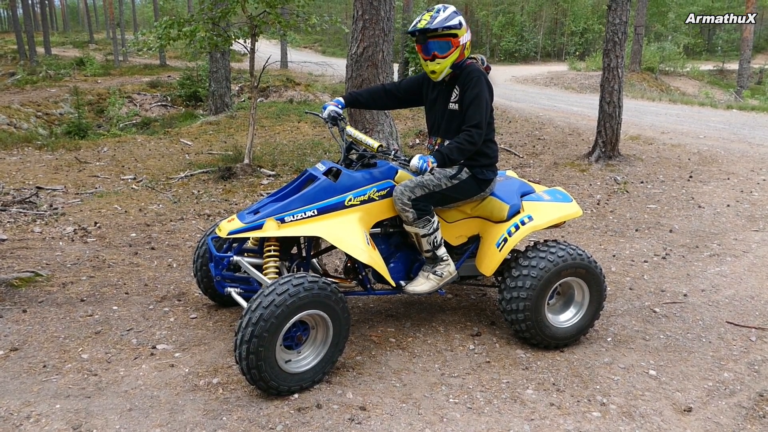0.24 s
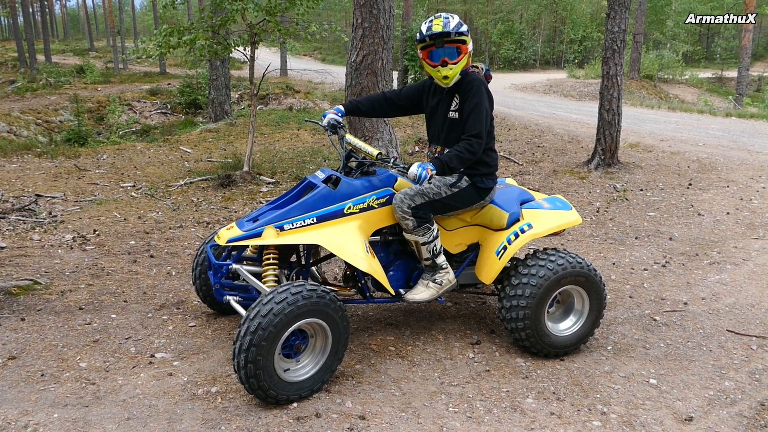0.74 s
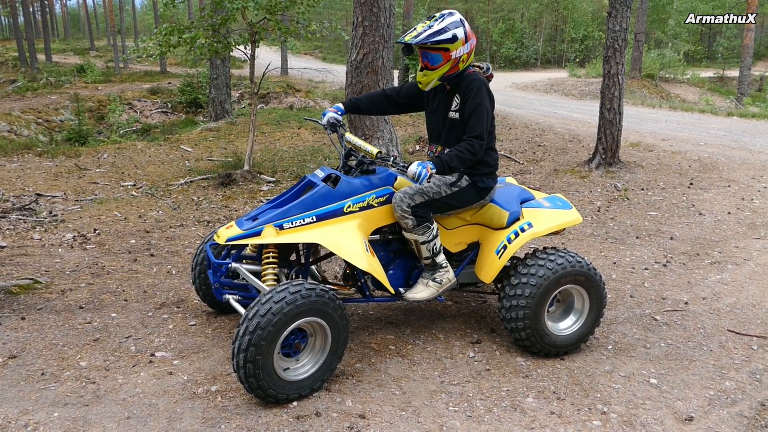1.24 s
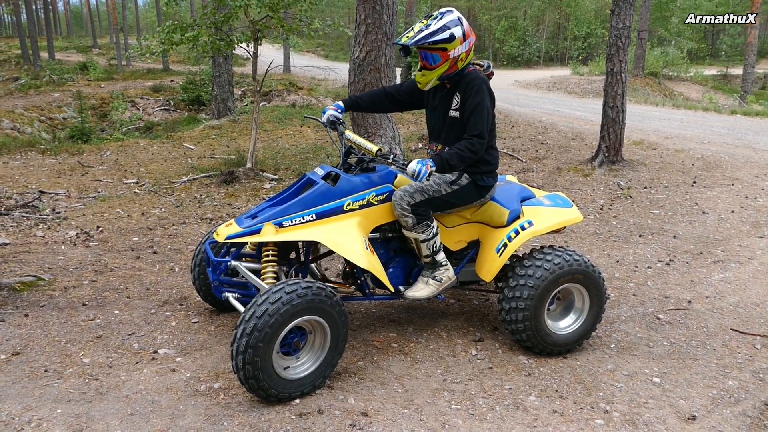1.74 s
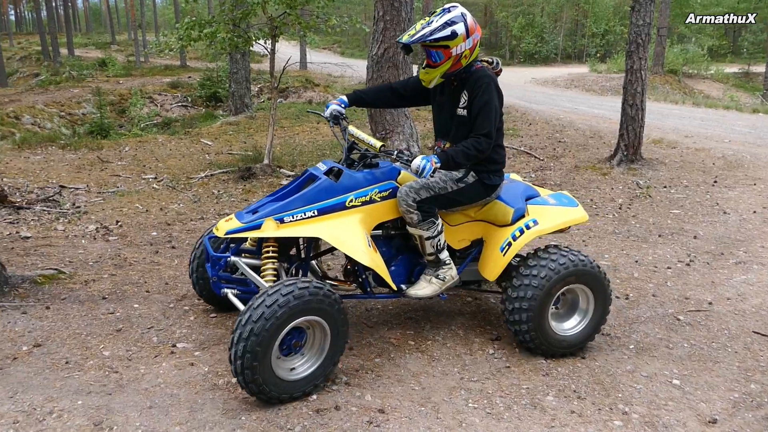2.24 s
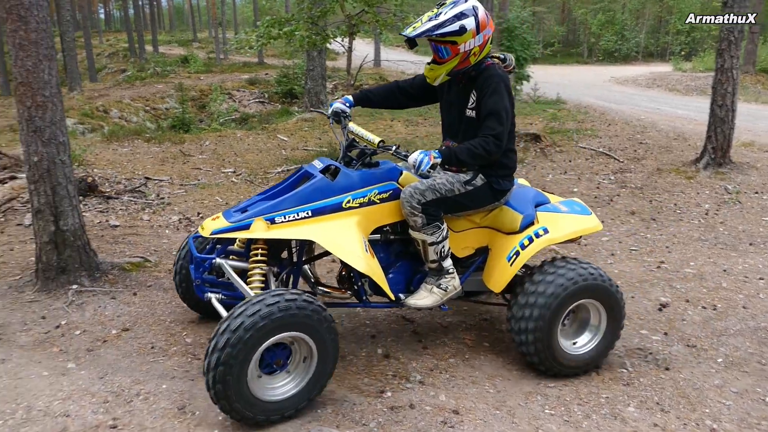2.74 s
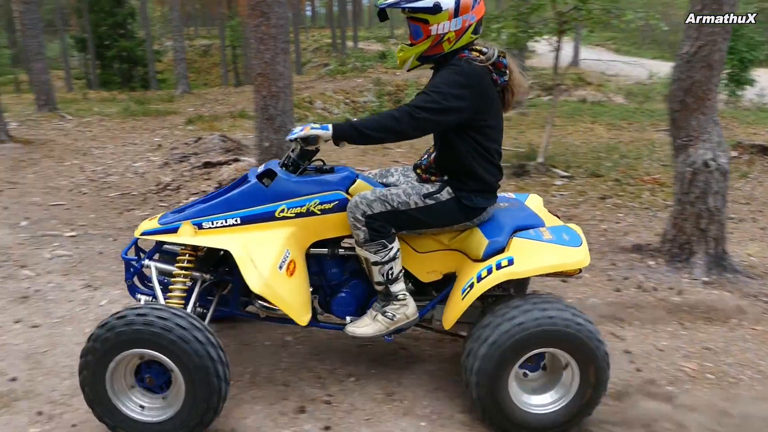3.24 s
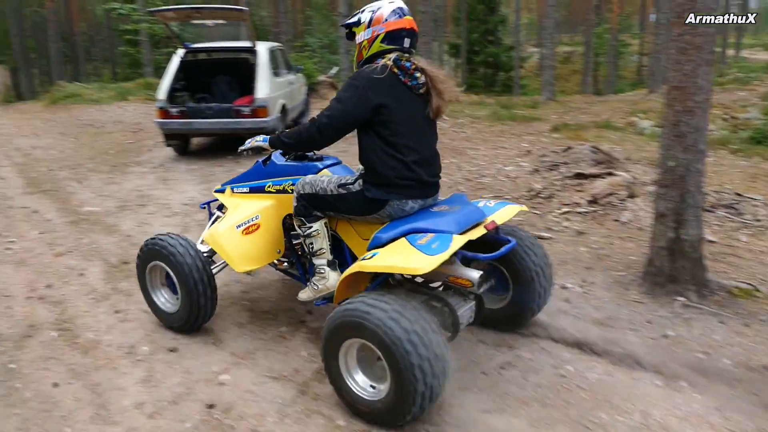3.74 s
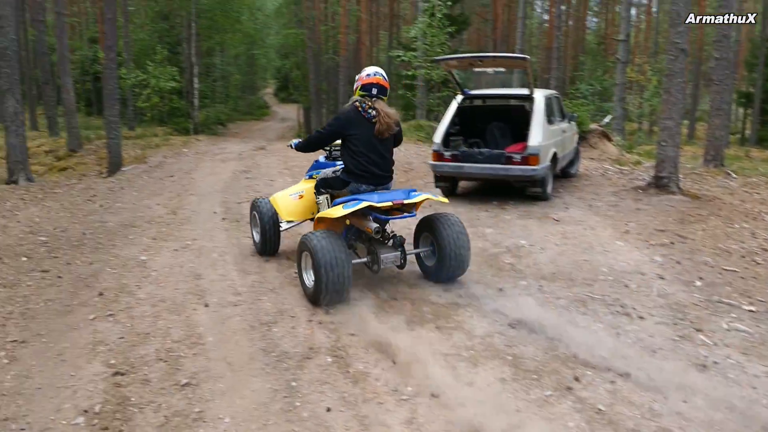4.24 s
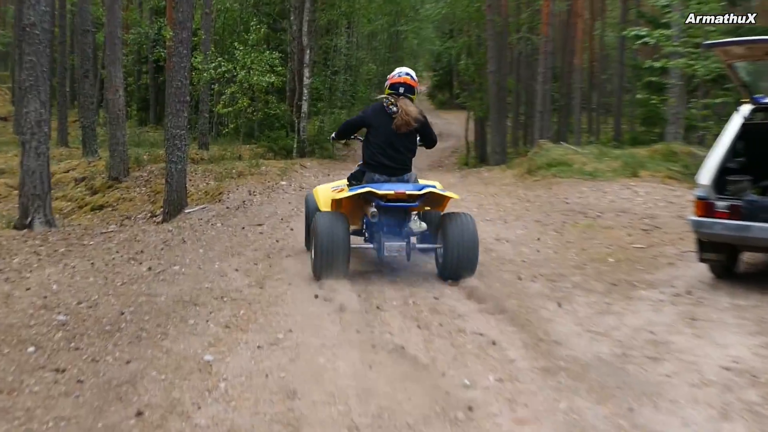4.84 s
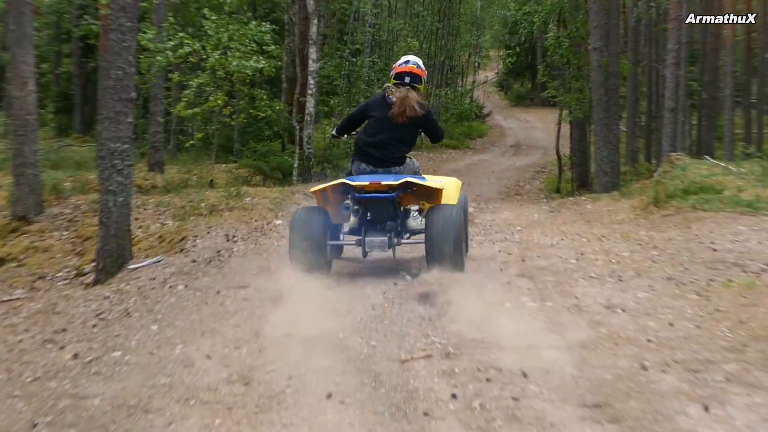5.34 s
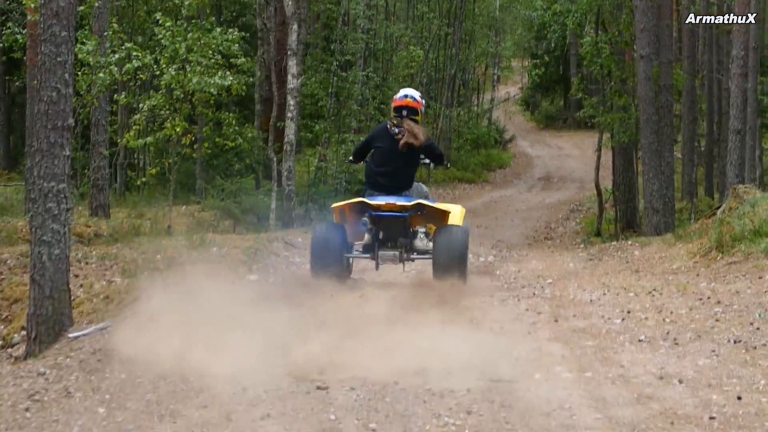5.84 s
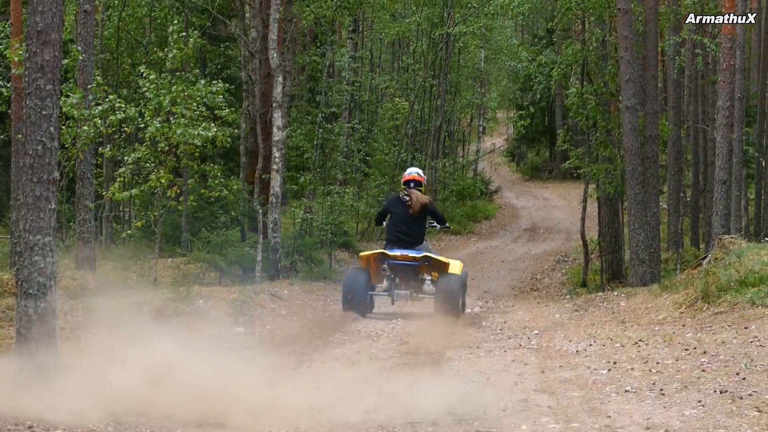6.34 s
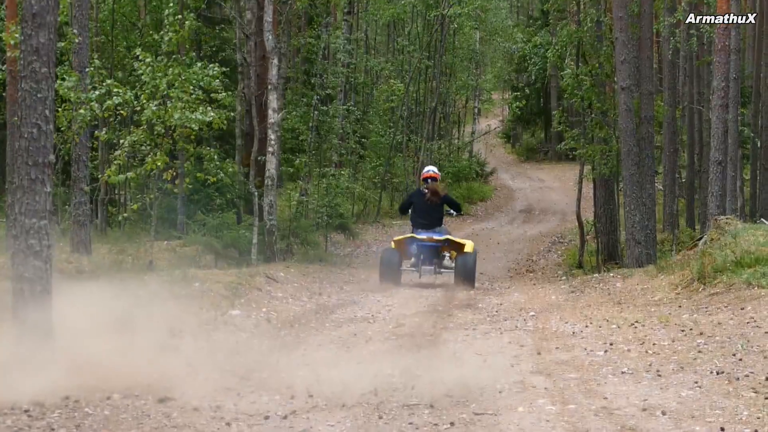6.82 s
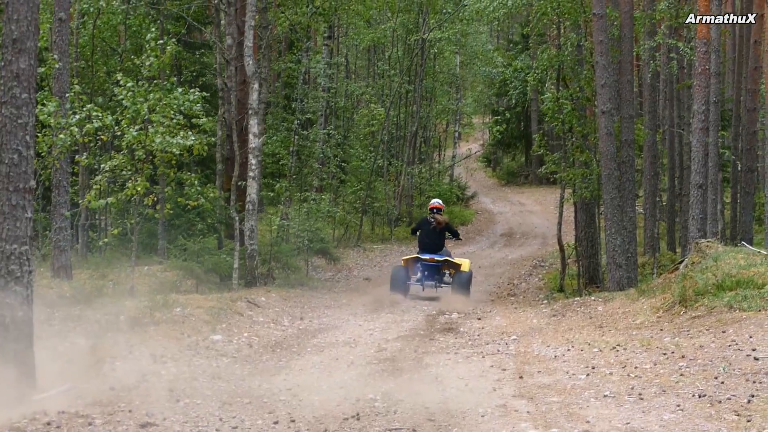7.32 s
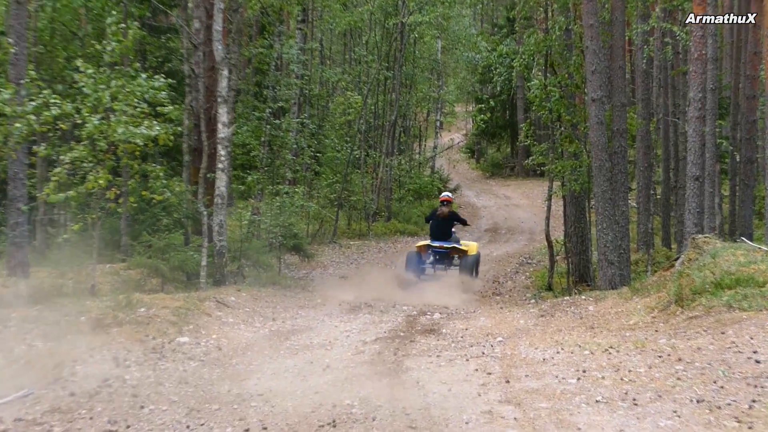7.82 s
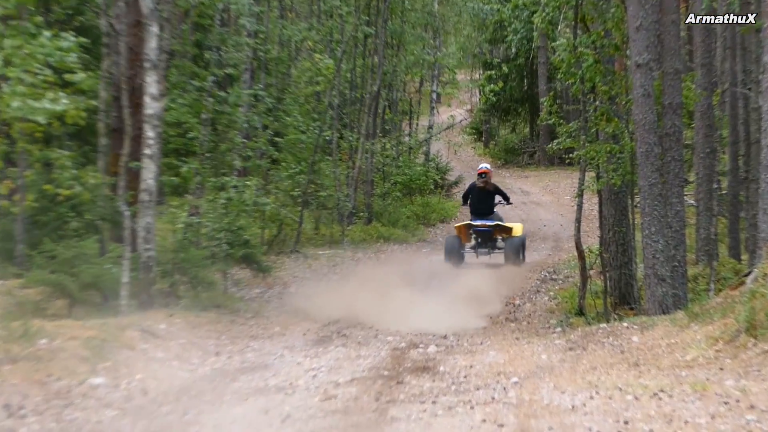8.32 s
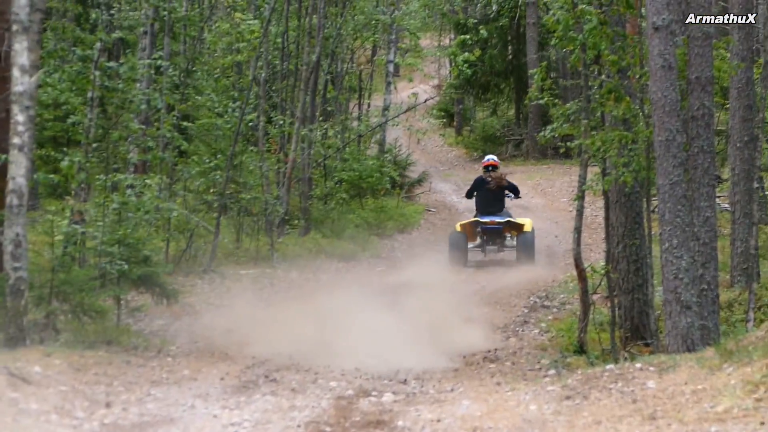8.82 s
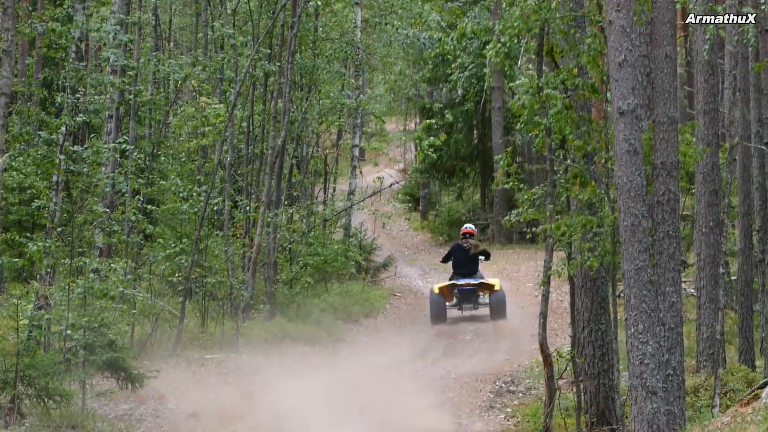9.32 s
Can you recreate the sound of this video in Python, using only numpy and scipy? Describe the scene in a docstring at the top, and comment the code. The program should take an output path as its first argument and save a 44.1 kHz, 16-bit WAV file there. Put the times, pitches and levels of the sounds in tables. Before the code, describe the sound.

Sputtering single-cylinder off-road engine with metallic exhaust ring pops at rest, accelerates hard in surges, then eases to a softer hum among trees.

```python
"""The tailpipe of a single-cylinder two-stroke quad barks, blipped at standstill on a forest track, then riding away.
Each firing sends a pressure pulse down the exhaust and rings the thin steel expansion chamber and the gas in it.
At light throttle only some crank turns fire and the rest puff; under load mostly every turn fires and the note smooths.
Intake gulps, piston slap and the rush of gears and chain lie beneath, and the trees scatter it all into a tail."""
import sys
import numpy as np
from scipy import signal
from scipy.fft import rfft, irfft
from scipy.io import wavfile
from scipy.ndimage import map_coordinates

SR = 44100
rng = np.random.default_rng(int(sys.argv[2]) if len(sys.argv) > 2 else 0)


def output_pcm(signal):
    """Save a mono or channel-first signal as 16-bit PCM at the path in sys.argv[1].

    Samples are clipped to [-1, 1] before scaling.
    """
    pcm = np.clip(np.atleast_2d(signal).T, -1, 1) * 32767
    wavfile.write(sys.argv[1], SR, np.round(pcm).astype(np.int16))


N = 422037
TIME = np.arange(N) / SR
KERNEL = 4096  # length of an impulse response, samples
KERNEL_HZ = np.maximum(np.fft.rfftfreq(KERNEL, 1 / SR), 1)
IDLE_TURNS_PER_S = 50

# crank speed: [time_s, turns_per_s]
CRANK_SPEED = [(0, 53), (.22, 46.7), (.29, 49), (.5, 44.8), (.58, 50), (.68, 53.5), (.76, 51.5), (.92, 47),
               (1, 44.6), (1.6, 45.8), (1.9, 53), (2.2, 49.3), (2.45, 41.6), (2.85, 46.4), (3.15, 45.4),
               (3.4, 54.2), (3.65, 53.2), (4, 64), (4.14, 77.5), (4.65, 48), (4.8, 55.6), (5.17, 61),
               (5.3, 73), (5.38, 83.3), (5.54, 107), (5.75, 76.3), (5.92, 94.4), (6.1, 88), (6.45, 55),
               (6.7, 61.5), (7.1, 64), (7.27, 75.5), (7.41, 82), (7.63, 90), (7.9, 99), (8.06, 105),
               (8.28, 72.8), (9.1, 74), (9.16, 79), (9.29, 71.5), (9.57, 71)]
# the quad turns its tail to the listener: [time_s, view (0 side, 1 rear quarter, 2 rear)]
VIEW_ANGLE = [(3, 0), (3.4, 1.05), (4.1, 0.85), (4.42, 1.49), (4.75, 1.62), (5.2, 1.78), (6.8, 1.8),
              (7.7, 1.8)]
# sound between firings: [time_s, puff_db, clatter_db (at idle speed)]
COASTING = [(0, -15.5, -23.5), (.2, -20.5, -22), (.35, -22.5, -26), (.62, -21, -25.5), (.72, -21, -27),
            (.95, -20, -24), (1.3, -24, -26), (1.6, -23.5, -29), (2.9, -24.5, -29.5), (3.3, -33, -29),
            (4.2, -26.5, -35), (4.4, -27, -35.5), (6.2, -32.5, -40.5), (6.45, -34.5, -41), (8.4, -32, -40),
            (8.9, -31, -40), (9.55, -28.5, -37.5)]
# radiation of the tailpipe: [frequency_hz, side_db, rear_quarter_db, rear_db]
TAILPIPE_COLOUR = [(40, -54, -34, -52), (84, -18.5, -11.5, -28.5), (137, -5, -8, -13),
                   (180, 0.5, -8.5, -4.5), (221, 1.5, -0.5, 1), (283.4, 1.5, 1.5, 4.5), (372, -8, -4.5, -1),
                   (454, -7, 1.5, -1.5), (530, 1, -5.5, -8.5), (688, 0, -3.5, -12), (842, -2.5, -5, -22.5),
                   (956, -10, -19, -24.5), (1187, -12, -16, -14.5), (1620, -22.5, -23, -33),
                   (2000, -24, -36, -21.5), (2390, -25, -36, -31), (3850, -36, -35, -65),
                   (18000, -73, -57, -72)]
# standing waves along the exhaust: [frequency_hz, width_hz, level_db]
STANDING_WAVES = [(191.5, 38, -2), (285.7, 45, -3.5), (344, 37, -6), (664, 57, -7.5), (825, 82, -9.5)]
# hotter gas carries sound faster and raises the chamber's pitch: [time_s, pitch_ratio]
GAS_HEAT = [(1.55, .82), (2.05, .91), (2.4, .95), (2.75, 1), (3.75, 1), (4.05, 1.09), (4.65, .97), (5, .99),
            (5.45, 1.14), (6.1, 1.12), (6.65, .92), (7, .97), (7.45, 1.14), (8.05, 1.2)]
# broad modes of the gas in the chamber: [frequency_hz (at a pitch ratio of one), level_db]
CHAMBER_GAS = [(3035, 5), (3500, -7), (4130, 0), (4780, 2.5), (5650, -5.5)]
# modes of the chamber's steel wall: [frequency_hz, level_db]
CHAMBER_WALL = [(2149, 3), (2492, -0.5), (2778, 3), (2880, -4), (3031, 4), (3208, -1.5), (3467, -5),
                (3709, -1), (3779, 1), (3990, -1.5), (4097, 1), (4284, -2), (4468, -8), (4770, 2),
                (4805, 1.5), (5437, -2), (6804, 2)]


def from_db(db):
    """Amplitude gain is ten to the power of decibels over twenty."""
    return 10 ** (np.asarray(db) / 20)


def unit(x):
    """Normalisation: the squares along the last axis sum to one."""
    return x / np.sqrt(np.sum(x ** 2, axis=-1, keepdims=True) + 1e-20)


def at_time(rows, s):
    """Linear interpolation of every column of a curve at the given times."""
    times, *columns = np.transpose(rows)
    return [np.interp(s, times, column) for column in columns]


def at_hz(rows, hz):
    """Interpolation of every column of a spectrum along logarithmic frequency."""
    points, *columns = np.transpose(rows)
    return np.array([np.interp(np.log(hz), np.log(points), column) for column in columns])


def response(db):
    """Minimum phase: folding the cepstrum gives a causal impulse response of unit energy."""
    cepstrum = irfft(np.log(from_db(db)))
    cepstrum[..., 1:KERNEL // 2] *= 2
    cepstrum[..., KERNEL // 2 + 1:] = 0
    return unit(irfft(np.exp(rfft(cepstrum))))


def through(x, impulse):
    """Linear filtering: convolve with an impulse response; gives channels x N."""
    return signal.oaconvolve(np.atleast_2d(x), np.atleast_2d(impulse), axes=-1)[:, :N]


def high_pass(x, order, hz):
    """Butterworth filter: keep what lies above a frequency."""
    return signal.sosfilt(signal.butter(order, hz, "high", fs=SR, output="sos"), x)


def all_pass(x, hz, q):
    """Phase dispersion: delay the waves around a frequency without changing their level."""
    poles = signal.iirpeak(hz, q, SR)[1]
    return signal.lfilter(poles[::-1], poles, x)


def add(track, s, sound):
    """Superposition: mix a sound into a track at a time."""
    i = int(np.clip(s * SR, 0, N - 1))
    track[i:i + len(sound)] += sound[:N - i]


def clicks(times, sizes):
    """Impulse train: one click of the given size at each time."""
    return np.bincount(np.clip(times * SR, 0, N - 1).astype(int), sizes, N)


def fading(power, t60_s):
    """Exponential decay: spread the energy of each click over time and return the amplitude."""
    keep = from_db(-120 / (t60_s * SR))  # power falls 60 dB in t60_s
    return np.sqrt(signal.lfilter([1 - keep], [1, -keep], power + 1e-18))


def stereo_noise(size, side_db):
    """Interaural coherence: white noise shared by both ears plus a side part of opposite sign."""
    mid, side = rng.standard_normal((2, size))
    return mid + from_db(side_db) * side * [[1], [-1]]


def rearward():
    """Directivity weight at every sample: zero from the side, one from the rear."""
    return at_time(VIEW_ANGLE, TIME)[0] / 2


def crank(jitter_s):
    """Intermittent combustion: times of firing turns, hardness of their burn in dB, times of unfired turns."""
    # stretches of firing: [first_s, last_s, firing_turns, out_of_turns, hardness_db]
    firing_stretches = [(.236, .257, 1, 1, 0.5), (.466, .466, 1, 1, -12), (.53, .551, 1, 1, 0.5),
                        (.651, .651, 1, 1, 0.5), (.931, .931, 1, 1, -18), (1.019, 1.042, 1, 1, -0.5),
                        (1.175, 1.197, 1, 1, -1), (1.35, 1.35, 1, 1, 4), (1.372, 1.372, 1, 1, 0),
                        (1.482, 1.482, 1, 1, 3), (1.503, 1.503, 1, 1, -3), (1.586, 1.67, 1, 4, 1.5),
                        (1.735, 1.835, 2, 4, -1.5), (1.914, 2.246, 2, 4, 1), (2.287, 2.309, 1, 1, -2),
                        (2.351, 2.537, 1, 2, 1.7), (2.584, 2.607, 1, 1, 0), (2.652, 2.717, 1, 1, 0),
                        (2.762, 2.762, 1, 1, 3.5), (2.783, 2.865, 1, 1, 0), (2.909, 2.974, 1, 1, 1.5),
                        (3.02, 3.02, 1, 1, 3), (3.042, 3.364, 1, 1, -.5), (3.398, 3.468, 2, 3, 1.5),
                        (3.523, 3.523, 1, 1, 5), (3.581, 3.6, 1, 1, 2), (3.641, 3.695, 1, 1, 1),
                        (3.73, 3.947, 2, 3, -0.5), (3.98, 4.14, 1, 1, 0), (4.423, 4.423, 1, 1, 3.5),
                        (4.441, 4.458, 1, 1, 0), (4.493, 4.511, 1, 1, -1), (4.569, 4.569, 1, 1, 3.5),
                        (4.631, 4.631, 1, 1, 2.5), (4.695, 4.792, 1, 1, -3), (4.828, 5.059, 2, 3, -0.5),
                        (5.093, 5.128, 1, 1, -0.5), (5.161, 5.422, 1, 1, -0.5), (5.432, 5.432, 1, 1, 4.5),
                        (5.443, 5.543, 1, 1, -1), (5.573, 5.573, 1, 1, -2.5), (5.669, 5.67, 1, 1, -5),
                        (5.727, 5.727, 1, 1, 5.5), (5.765, 5.925, 1, 1, -0.5), (5.947, 6.091, 2, 4, -1),
                        (6.164, 6.164, 1, 1, -9), (6.47, 6.556, 2, 4, 0), (6.627, 6.693, 2, 3, 0.5),
                        (6.742, 7.025, 2, 4, 0), (7.074, 7.624, 1, 1, -0.5), (7.646, 8.055, 1, 1, -1),
                        (8.075, 8.128, 1, 5, -9), (9.122, 9.122, 1, 1, 1)]
    angle = np.cumsum(at_time(CRANK_SPEED, TIME)[0]) / SR  # turns

    def turns(start, end, firing=1, cycle=1):
        """Rotation: times equally spaced in crank angle, with a whole number of cycles."""
        a, b = np.interp([start, end], TIME, angle)
        count = max(round((b - a - firing + 1) / cycle), 0) * cycle + firing
        return np.interp(np.linspace(a, b, count), angle, TIME)

    fired, hardness, unfired, previous = [], [], [0], 0
    for first, last, firing, cycle, hardness_db in firing_stretches:
        firing, cycle = round(firing), round(cycle)
        stretch = turns(first, last, firing, cycle)
        fires = np.arange(len(stretch)) % cycle < firing
        fired += list(stretch[fires])
        hardness += [hardness_db] * fires.sum()
        unfired += list(turns(previous, first)[1:-1])
        unfired += list(stretch[~fires])
        previous = stretch[-1]
    unfired += list(turns(previous, TIME[-1])[1:-1])
    fired, unfired = flywheel(np.array(fired), np.array(unfired))
    jitter = jitter_s * unsteadiness(fired) * rng.standard_normal(len(fired))
    return fired + jitter, np.array(hardness), unfired


def flywheel(fired, unfired):
    """Rotational inertia: the flywheel evens out the spacing of neighbouring turns."""
    turns = np.sort(np.concatenate([fired, unfired]))
    even = turns.copy()
    even[2:-2] = np.convolve(turns, np.array([1, 2, 3, 2, 1]) / 9, "valid")
    return np.interp(fired, turns, even), np.interp(unfired, turns, even)


def unsteadiness(times):
    """Cyclic variation: burns grow more even as the engine speeds up; one at idle speed."""
    return (IDLE_TURNS_PER_S / at_time(CRANK_SPEED, times)[0]) ** 1.3


def burn(fired, hardness_db):
    """Combustion strength: boom, bark and ring in dB; a harder burn mostly adds bark."""
    # how a firing reaches the listener, energy per 10 ms: [time_s, boom_db, bark_db, ring_db]
    firing_levels = [(0, -15.5, -22, -16), (1.4, -14.5, -20, -15.5), (2.1, -17.5, -24.5, -17.5),
                     (3.15, -17, -25, -19.5), (3.55, -16, -23, -18.5), (4.1, -14.5, -22, -25.5),
                     (4.45, -12, -25.5, -25), (4.8, -11.5, -28, -24), (5.3, -11, -27.5, -22.5),
                     (5.5, -13, -23.5, -28), (6.1, -13.5, -23.5, -27), (6.47, -16, -39, -31),
                     (7.08, -12.5, -36.5, -27), (7.17, -15.5, -40, -27), (7.28, -10.5, -36, -26.5),
                     (7.45, -11.5, -31.5, -27), (8.05, -13, -25.5, -27), (9.1, -12.5, -41, -25.5)]
    boom_db, bark_db, ring_db = at_time(firing_levels, fired)
    # the first firing after a pause of 30 ms burns a fresher charge, which stands out most from the side
    fresh = (np.diff(fired, prepend=0) > .03) * (1 - at_time(VIEW_ANGLE, fired)[0] / 2)
    return (boom_db + .25 * hardness_db,
            bark_db + hardness_db + 4 * fresh,
            ring_db + .58 * hardness_db + 1.1 * fresh)


def tailpipe(times, boom_db, bark_db, split_hz, uneven_db, bark_uneven_db,
             sweep_hz, sweep_q, droop_hz, droop_q):
    """Pulse radiation: each firing sends out a pressure pulse with a boom and a bark above it."""
    view = at_time(VIEW_ANGLE, times)[0]
    view_weights = np.maximum(1 - abs(view[:, None] - np.arange(3)), 0)
    shape = from_db(view_weights @ at_hz(TAILPIPE_COLOUR, KERNEL_HZ))
    upper = 1 / (1 + (split_hz / KERNEL_HZ) ** 8)
    chance = rng.standard_normal((len(times), 2)) * unsteadiness(times)[:, None]
    boom = from_db(boom_db + uneven_db * chance[:, 0])
    bark = from_db(bark_db + uneven_db * chance[:, 0] + bark_uneven_db * chance[:, 1])
    colour = boom[:, None] * unit(shape * (1 - upper)) + bark[:, None] * unit(shape * upper)
    # toward the rear, a hard bark steepens into a crack: treble lift per dB of bark above -23.5 dB
    steep_db = 1.35 * np.maximum(bark_db + 23.5, 0) * view / 2
    treble = 1 / (1 + (1400 / KERNEL_HZ) ** 8)
    sung = colour * song(times) * from_db(steep_db[:, None] * treble)
    sung = sung * ragged(times, spread_db=2.5, low_hz=401, high_hz=3000, count=16)
    lift = np.linalg.norm(sung, axis=1) / np.linalg.norm(colour, axis=1)
    sizes = np.hypot(boom, bark) * lift
    out = np.zeros(N)
    for s, size, pulse in zip(times, sizes, response(20 * np.log10(sung))):
        add(out, s, size * np.sqrt(SR / 100) * pulse)  # level is per 10 ms
    # the silencer holds the lows back, so each pulse sweeps downward
    out = all_pass(out, sweep_hz, sweep_q)
    return all_pass(out, droop_hz, droop_q)


def song(times):
    """Pipe resonance: under load the tuned pipe lifts a moving howl and a nasal buzz above it."""
    # the pipe's lift of each firing: [time_s, howl_hz, howl_db, buzz_db]
    pipe_song = [(2.6, 747, 0.5, 2), (3.4, 689, 2, 0), (4.1, 770, 9, 2), (4.45, 784, 6, 2),
                 (4.7, 716, -5, 5), (5.1, 690, 1.5, 0), (5.42, 690, 8.5, 4), (5.9, 690, 2.5, 1),
                 (6.5, 670, 5, -3), (7.4, 690.5, 5.5, 2.5), (7.7, 691, -1, 6), (8, 689, -4, 6.5)]
    howl_hz, howl_db, buzz_db = (column[:, None] for column in at_time(pipe_song, times))
    howl = np.exp(-(2 * (KERNEL_HZ - howl_hz) / 130) ** 2)  # 130 Hz wide
    buzz = np.exp(-(2 * (KERNEL_HZ - 1240) / 460) ** 2)  # 460 Hz wide
    return from_db(howl_db * howl + buzz_db * buzz)


def ragged(times, spread_db, low_hz, high_hz, count):
    """Spectral variation: a chance gain by frequency gives every burn a colour of its own."""
    chance = rng.standard_normal((len(times), count)) * unsteadiness(times)[:, None]
    chance[:, 0] = 0  # the lows stay as they are
    spectrum = np.column_stack([np.geomspace(low_hz, high_hz, count), chance.T])
    return from_db(spread_db * at_hz(spectrum, KERNEL_HZ))


def pipe(x, rear_db, outlet_db):
    """Standing waves: part of each pulse stays in the pipe and rings on, heard best from beside it."""
    behind = rearward()
    ringing = sum(from_db(db) * signal.lfilter(*signal.iirpeak(hz, hz / width, SR), x)
                  for hz, width, db in STANDING_WAVES)
    return x * from_db(outlet_db * (1 - behind)) + ringing * from_db(rear_db * behind ** 2)


def rasp(times, bark_db, side_db, rear_db, t60_s, low_hz):
    """Jet turbulence: the outlet flow tears into a short burst of noise with each bark."""
    power = clicks(times, from_db(bark_db) ** 2 * SR / 100)  # level is per 10 ms
    burst = fading(power, t60_s) * rng.standard_normal(N)
    cut_db = -10 * np.log10(1 + (low_hz / np.maximum(KERNEL_HZ, 100)) ** 8)
    beside, _, behind = through(burst, response(at_hz(TAILPIPE_COLOUR, KERNEL_HZ) + cut_db))
    away = rearward()
    return from_db(side_db) * beside * (1 - away) + from_db(rear_db) * behind * away


def blowdown(times, boom_db, side_db, rear_db, t60_s, low_hz):
    """Flow excitation: turbulent gas rushes out after each firing and keeps the pipe sounding roughly."""
    level_db = boom_db + np.interp(at_time(VIEW_ANGLE, times)[0], [0, 2], [side_db, rear_db])
    power = clicks(times, from_db(level_db) ** 2 * SR / 100)  # level is per 10 ms
    rush = high_pass(rng.standard_normal(N), 2, low_hz)
    return through(fading(power, t60_s) * rush, cavity(STANDING_WAVES))


def cavity(table):
    """Damped resonance: impulse response of a few decaying modes, of unit energy."""
    t = TIME[:KERNEL]
    return unit(sum(from_db(db) * np.cos(2 * np.pi * hz * t) * np.exp(-np.pi * width * t)
                    for hz, width, db in table))


def chamber(times, ring_db, t60_s, gas_t60_s, wall_t60_s, swell_s, gas_db, wall_db, dense_db,
            hidden_db, wall_hidden_db, hiss_db, hiss_t60_s, crack_db, crack_t60_s, side_db):
    """Modal ringing: each firing excites the steel chamber and its gas, with a rush and a bright crack."""
    # broad colour of the chamber: [frequency_hz, side_db, rear_db]
    chamber_colour = [(900, -33, -36), (1900, -16, -18), (2450, -3.5, -9), (3340, -2.5, -1), (4700, 0, 1),
                      (5930, 0, 0.5), (7780, -7, -6), (9760, 0, -2), (12200, -7.5, -10),
                      (15300, -19.5, -24), (18000, -13, -17)]
    sizes = from_db(ring_db) * np.sqrt(SR / 100)  # level is per 10 ms
    t = TIME[:SR // 2]
    swell = 1 - np.exp(-t / swell_s)
    dense = unit(stereo_noise(len(t), side_db) * swell * from_db(-60 * t / t60_s))
    # the clear ring fades as the chamber turns out of sight
    turned = (at_time(VIEW_ANGLE, times)[0] / 2) ** 2
    seen = sizes * from_db(hidden_db * turned)
    # gas and dense ringing run on a clock that speeds up with the heat, which also shortens their decay
    clock = np.cumsum(at_time(GAS_HEAT, TIME)[0]) / SR
    on_clock = np.interp(times, TIME, clock)
    gas_envelope = swell * from_db(-60 * t / gas_t60_s)
    rung = from_db(dense_db) * through(clicks(on_clock, seen), dense)
    rung = rung + from_db(gas_db) * struck(on_clock, seen, CHAMBER_GAS, gas_envelope)
    rung = np.array([map_coordinates(ear, [clock * SR], order=3) for ear in rung])
    # the steel keeps its pitch
    wall_sizes = sizes * from_db(wall_hidden_db * turned)
    wall_envelope = swell * from_db(-60 * t / wall_t60_s)
    wall = struck(times, wall_sizes, CHAMBER_WALL, wall_envelope, coupling(times))
    rung = rung + from_db(wall_db) * wall
    # two decays in a row let the rush swell before it fades
    power = fading(clicks(times, sizes ** 2), hiss_t60_s) ** 2
    rush = from_db(hiss_db) * fading(power, hiss_t60_s / 3) * stereo_noise(N, side_db)
    # firings that ring below -12.5 dB crack disproportionately less
    hard = clicks(times, sizes ** 2 * from_db(2 * np.minimum(ring_db + 12.5, 0)))
    crack = from_db(crack_db) * fading(hard, crack_t60_s) * stereo_noise(N, side_db)
    total = rung + rush + high_pass(crack, 2, 7000)
    beside, behind = (through(total, h) for h in response(at_hz(chamber_colour, KERNEL_HZ)))
    away = rearward()
    return beside * (1 - away) + behind * away


def struck(times, sizes, table, envelope, gains=1, uneven_db=2.5):
    """Modal superposition: every blow strikes each mode with a strength and sign of its own."""
    pitches_hz, levels_db = np.transpose(table)
    t = TIME[:len(envelope)]
    shape = len(times), len(table)
    signs = rng.choice([-1, 1], shape)
    uneven = from_db(uneven_db * rng.standard_normal(shape))
    strengths = signs * uneven * unit(from_db(levels_db)) * gains
    return sum(through(clicks(times, sizes * strength), unit(np.sin(2 * np.pi * hz * t) * envelope))
               for hz, strength in zip(pitches_hz, strengths.T))


def coupling(times):
    """Mode coupling: gain of each wall mode at each firing, greater while a gas mode lies close to it."""
    gas_hz = at_time(GAS_HEAT, times)[0][:, None, None] * np.array(CHAMBER_GAS)[:, 0]
    wall_hz = np.array(CHAMBER_WALL)[:, :1]
    near = np.exp(-(2 * (wall_hz - gas_hz) / 230) ** 2)  # 230 Hz wide
    return from_db(7.5 * near.max(axis=2))


def puffs(times, weight_db, uneven_db, rear_uneven_db, jitter_s, rear_jitter_s, lag_s):
    """Periodic pumping: a soft puff per turn hums between firings, less evenly as the tail turns to us."""
    # colour of a puff: [frequency_hz, side_db, rear_db]
    puff_colour = [(30, -53, -48), (65, -27, -36), (88, -6, -28), (102.4, -2, -23), (121, -21, -6),
                   (148, -26, -3.5), (185, -4.5, -3), (208, 1, -2), (232.9, -4, -0.5), (259, 1, -2),
                   (306, -6.5, -4), (366, -11, 1.5), (440, -11, -1.5), (521, -13.5, -7), (640, -12, -19.5),
                   (1070, -31, -38), (2500, -40, -58), (7000, -70, -72), (20000, -90, -90)]
    rear = at_time(VIEW_ANGLE, times)[0] / 2
    side_db, rear_db = at_hz(puff_colour, KERNEL_HZ)
    colour_db = side_db * (1 - rear[:, None]) + rear_db * rear[:, None]
    chance = rng.standard_normal((len(times), 2))
    spread_db = np.interp(rear, [0, 1], [uneven_db, rear_uneven_db])
    spread_s = np.interp(rear, [0, 1], [jitter_s, rear_jitter_s])
    level_db = at_time(COASTING, times)[0] + weight_db + spread_db * chance[:, 0]
    # a puff carries the energy of one whole turn
    sizes = from_db(level_db) * np.sqrt(SR / at_time(CRANK_SPEED, times)[0])
    out = np.zeros(N)
    for s, size, pulse in zip(times + lag_s + spread_s * chance[:, 1], sizes, response(colour_db)):
        add(out, s, size * pulse)
    return out


def baffles(x, low_hz, high_hz, q):
    """Dispersion: the silencer's baffles smear weak puffs into a drone."""
    for hz in np.geomspace(low_hz, high_hz, num=3):
        x = all_pass(x, hz, q)
    return x


def intake(times, weight_db, uneven_db, lag_s):
    """Cavity resonance: every turn gulps air and sets the airbox ringing."""
    # the airbox honks as the throttle opens on pulling away: [time_s, level_db]
    gulp_level = [(0, -52), (3.1, -34), (3.33, -20), (3.7, -20), (4.1, -25), (4.2, -42), (9.5, -68)]
    # airbox resonances: [frequency_hz, width_hz, level_db]
    airbox_modes = [(420, 85, 9.5), (790, 130, -8)]
    level_db = at_time(gulp_level, times)[0] + weight_db + uneven_db * rng.standard_normal(len(times))
    sizes = from_db(level_db) * np.sqrt(SR / at_time(CRANK_SPEED, times)[0])
    return through(clicks(times + lag_s, sizes), cavity(airbox_modes))


def clatter(times, slap_t60_s, steady_share, side_db):
    """Impact noise: the piston slaps once a turn over the steady rush of gears and chain."""
    # colour of piston, gears and chain: [frequency_hz, close_db, far_db]
    clatter_colour = [(30, -20, -30), (95, -5, -4.5), (154, -7, 1), (229, -1, 8), (300, 2, 5.5),
                      (514, -2, 1), (765, 1, -3), (1134, -7.5, -2.5), (1413, 6, -2.5), (1755, -12.5, -4.5),
                      (2150, -4, 0), (2850, -8.5, -7), (4270, -11.5, -6.5), (7800, -25.5, -17.5),
                      (9940, -21.5, -17), (15200, -41, -39)]
    speed = at_time(CRANK_SPEED, TIME)[0]
    uneven = from_db(rng.normal(0, 5.3, len(times)))  # acts on power
    slap_power = clicks(times, SR / at_time(CRANK_SPEED, times)[0] * uneven)
    slaps = fading(slap_power, slap_t60_s)
    envelope = np.sqrt(steady_share + (1 - steady_share) * slaps ** 2)
    noise = stereo_noise(N, side_db) * envelope
    close, far = (through(noise, h) for h in response(at_hz(clatter_colour, KERNEL_HZ)))
    away = rearward()
    # a faster engine clatters louder: 11.5 dB per doubling of speed
    level_db = at_time(COASTING, TIME)[1] + 11.5 * np.log2(speed / IDLE_TURNS_PER_S)
    return from_db(level_db) * (close * (1 - away) + far * away)


def forest(x, early_db, early_t60_s, late_db, late_t60_s, wide_hz, scatter_hz, bass_db, side_db):
    """Scattering: near trunks give a quick tail, far ones a long one; long waves mostly pass around them."""
    t = TIME[:SR]
    early = unit(from_db(-60 * t / early_t60_s) * np.minimum(t / 0.014, 1) ** 2)
    late = unit(from_db(-60 * t / late_t60_s) * np.minimum(t / 0.045, 1))
    tail = rng.standard_normal((2, SR)) * np.hypot(from_db(early_db) * early, from_db(late_db) * late)
    treble = high_pass(tail, 2, scatter_hz)
    mid, side = treble + from_db(bass_db) * late * rng.standard_normal((2, SR))
    side = from_db(side_db) * high_pass(side, 1, wide_hz)
    return through(x, mid + side * [[1], [-1]])


def scene():
    """Common excitation: the crank times every source of the engine, and the trees answer."""
    fired, hardness_db, unfired = crank(jitter_s=.00007)
    turns = np.concatenate([fired, unfired])
    boom_db, bark_db, ring_db = burn(fired, hardness_db)
    exhaust = tailpipe(fired, boom_db + .2, bark_db + 0.66, split_hz=584, uneven_db=1.0, bark_uneven_db=2.0,
                       sweep_hz=405, sweep_q=0.91, droop_hz=200, droop_q=.65)
    # lag of the chamber ring behind the tailpipe, from the side and from the rear
    lag_s = np.interp(at_time(VIEW_ANGLE, fired)[0], [0, 2], [-.003, .003])
    ring = chamber(fired + lag_s, ring_db + rng.normal(0, 0.86, len(fired)),
                   t60_s=0.15, gas_t60_s=0.083, wall_t60_s=0.19, swell_s=0.0054,
                   gas_db=-12.5, wall_db=-12.0, dense_db=-7, hidden_db=-7, wall_hidden_db=-14,
                   hiss_db=-4, hiss_t60_s=0.14, crack_db=-0.5, crack_t60_s=0.058, side_db=-16.5)
    # a firing breaks up the hum, so the puff of a fired turn is weaker
    pumping = puffs(turns, -9.5 * np.isin(turns, fired), uneven_db=1.0, rear_uneven_db=2.5,
                    jitter_s=.00006, rear_jitter_s=.0002, lag_s=0.00093)
    drone = baffles(pumping, low_hz=186.0, high_hz=372.4, q=2.4)
    # an unfired turn draws less air, so its gulp is weaker
    gulps = intake(turns, -7 * np.isin(turns, unfired), uneven_db=1.8, lag_s=0.00414)
    engine = from_db(-1.5) * clatter(turns, slap_t60_s=0.072, steady_share=0.69, side_db=-14.0) + gulps
    dry = from_db(-1.77) * pipe(exhaust + drone, rear_db=-7.5, outlet_db=-4.0) + engine
    dry = dry + rasp(fired, bark_db, side_db=-9, rear_db=-6.5, t60_s=.034, low_hz=1000)
    dry = dry + blowdown(fired, boom_db, side_db=-4, rear_db=-19.5, t60_s=.09, low_hz=186)
    # from behind, the body hides the chamber and its ring comes more by way of the trees
    behind = rearward()
    direct = ring * from_db(-1.0 * behind) * from_db([[.8], [-.8]])  # a little louder on the first channel
    scattered = forest(dry + ring * from_db(5.2 * behind), early_db=-11.5, early_t60_s=0.078,
                       late_db=-17.5, late_t60_s=0.58, wide_hz=644, scatter_hz=570, bass_db=-15.5, side_db=-4.5)
    return dry + direct + scattered


def record(dry, top=0.86):
    """Recording chain: the camera filters out two narrow bands, rounds the peaks and cuts the top."""
    # camera's notch filters: [frequency_hz, width_hz, depth_db]
    camera_notches = [(575, 104, -30), (2662, 137, -14)]
    for hz, width_hz, depth_db in camera_notches:
        band = signal.lfilter(*signal.iirpeak(hz, hz / width_hz, SR), dry)
        dry = dry - (1 - from_db(depth_db)) * band
    rounded = dry / (1 + (dry / top) ** 4) ** .25
    return signal.sosfilt(signal.ellip(10, .2, 80, 15700, fs=SR, output="sos"), rounded)


dry = scene()
out = record(dry)
output_pcm(out)
```